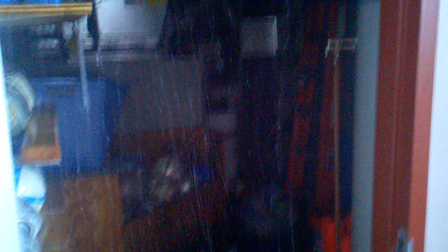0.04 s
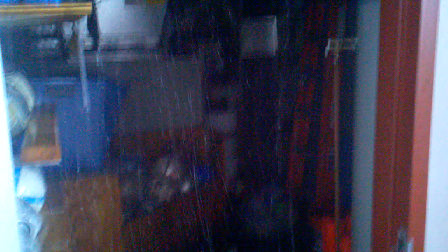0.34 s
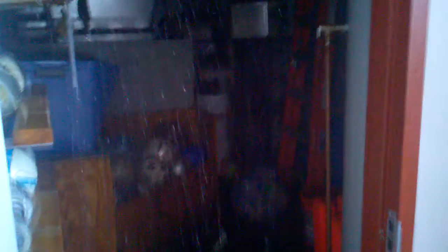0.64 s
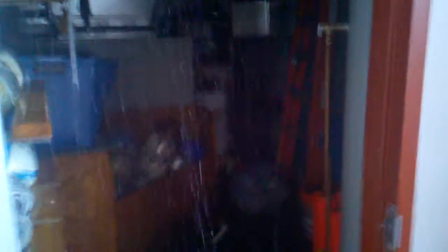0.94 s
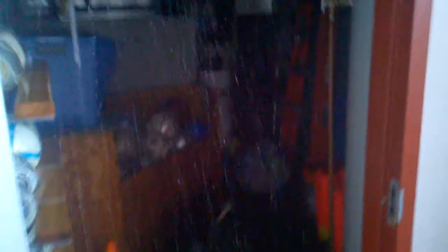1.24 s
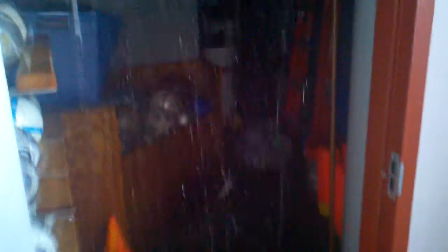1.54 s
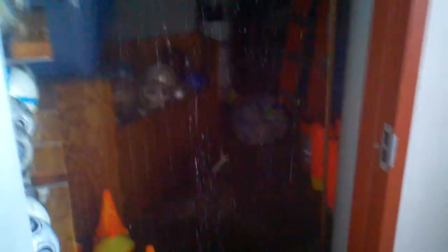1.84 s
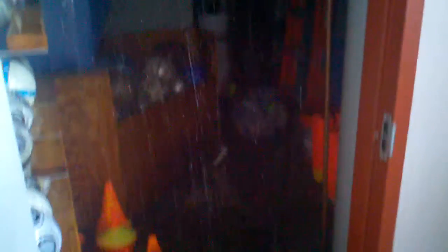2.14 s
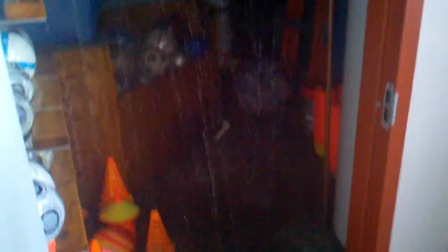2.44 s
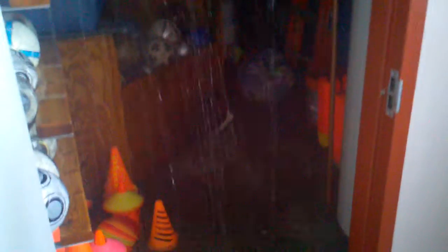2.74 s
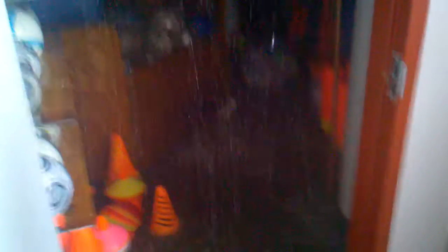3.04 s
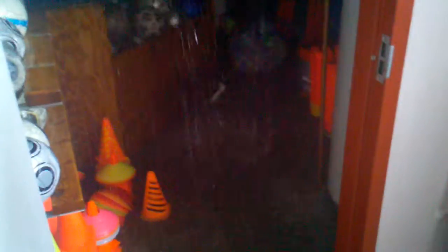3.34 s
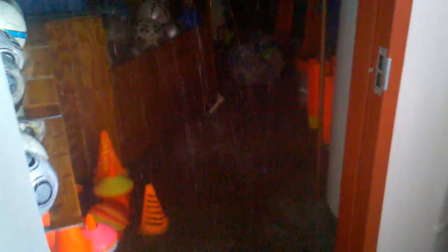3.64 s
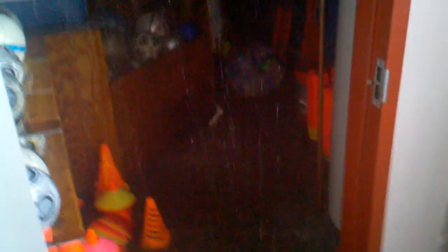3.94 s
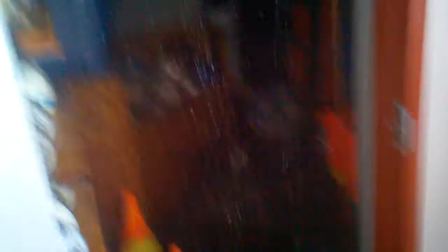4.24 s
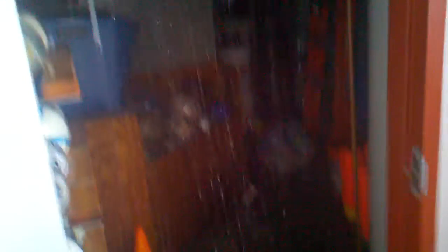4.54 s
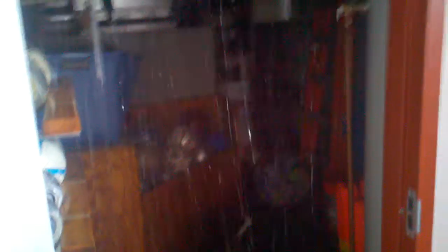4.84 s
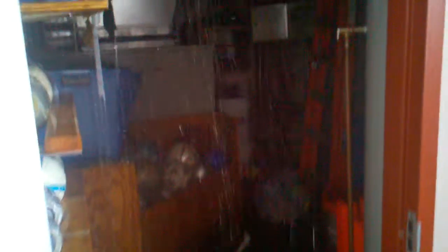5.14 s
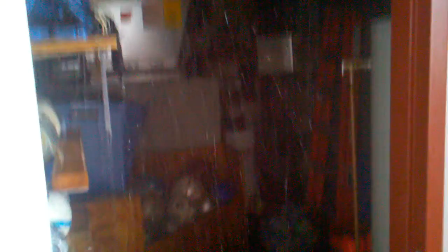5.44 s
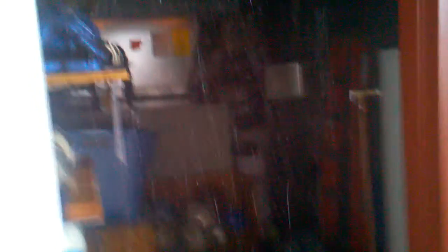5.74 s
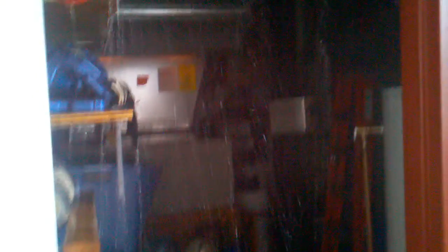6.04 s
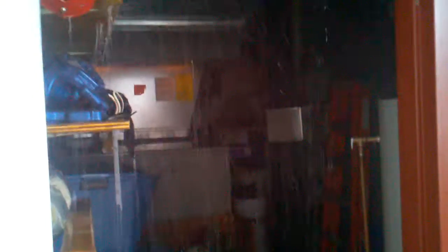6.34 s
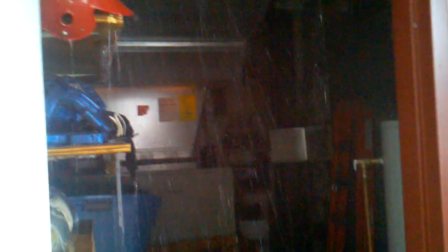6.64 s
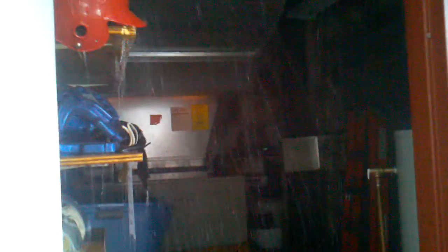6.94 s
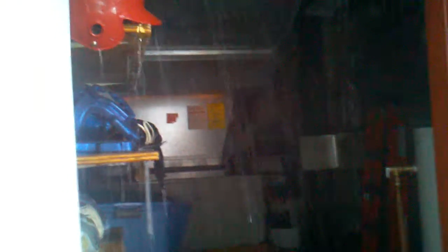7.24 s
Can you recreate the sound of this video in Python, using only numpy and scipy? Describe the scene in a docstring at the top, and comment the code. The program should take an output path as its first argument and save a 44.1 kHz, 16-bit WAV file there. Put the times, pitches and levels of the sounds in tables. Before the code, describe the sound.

After silence, at about 0.6 seconds the sound of water pouring from a ceiling fades in, reaching full level by 0.9 seconds. It is heard from the doorway of a small storeroom: a dense, bright hiss like heavy rain, with countless drops pattering on a wet floor, boxes and stored gear. Tiny puddle plinks and a faint low drumming of hollow objects lie underneath. A sharp drop ticks close to the microphone at 1.3 seconds, with softer ticks around 1.7 to 2.1, and at 5.3 and 5.6 seconds. Small plops fall into puddles between 1.9 and 4 seconds, and again from 6 to 6.6. Heavier gobs splat irregularly throughout, most clearly near 1.2, 2.7, 3.7, 4.2, 5.4 and 6.8 seconds. The downpour wavers slightly and grows a little stronger, still running at the end, around 7.5 seconds.

```python
"""A small storeroom, heard from the doorway: water pours from the flooded ceiling.
Thousands of drops hiss and patter on the wet floor and the stored gear, and hollow things drum
under the stream. Trapped air plinks and plops in the puddles, heavy gobs splat and near drops tick.
The sound fades in from silence."""
import sys
import numpy as np
from scipy import signal
from scipy.fft import rfft, irfft
from scipy.io import wavfile
from scipy.ndimage import uniform_filter1d

SR = 44100
rng = np.random.default_rng(int(sys.argv[2]) if len(sys.argv) > 2 else 0)


def generate_wav(sig):
    """Save sig (samples, or channels by samples) to the path in sys.argv[1] as 16-bit PCM at SR."""
    pcm = np.round(np.clip(np.atleast_2d(sig).T, -1, 1) * 32767).astype(np.int16)
    wavfile.write(sys.argv[1], SR, pcm)


N = 329471
T = np.arange(N) / SR
HZ = np.fft.rfftfreq(N, 1 / SR)
FRAMES = dict(fs=SR, nperseg=1024, noverlap=768)
RIGHT_LAG_S = .000395


def gain_of(db):
    """Decibels to gain."""
    return 10 ** (np.asarray(db) / 20)


def unit_rms(x):
    """Scales to an rms of 1."""
    return x / np.sqrt(np.mean(x ** 2) + 1e-20)


def curve_at(points, hz):
    """Reads a breakpoint curve on a log-frequency axis."""
    f, value = np.transpose(points)
    return np.interp(np.log(hz + 1), np.log(f + 1), value)


def add(mix, s, sound):
    """Mixes a stereo sound in at s seconds."""
    part = mix[:, round(s * SR):][:, :sound.shape[1]]
    part += sound[:, :part.shape[1]]


def band(x, hz, octaves):
    """A band-pass, bell-shaped on a log-frequency axis."""
    f = np.fft.rfftfreq(x.shape[-1], 1 / SR)
    return irfft(rfft(x) * np.exp(-.5 * (np.log2((f + 1) / hz) / octaves) ** 2), x.shape[-1])


def wobble(shape, *spans):
    """A random modulator, smoothed over one span of bins or frames per axis."""
    noise = rng.standard_normal(shape)
    for axis, span in enumerate(spans):
        noise = uniform_filter1d(noise, span, axis=axis)
    return unit_rms(noise)


def impacts(per_s, spread_db, max_spreads):
    """Random impulses, mostly small and a few large."""
    size = gain_of(spread_db * np.minimum(rng.exponential(1, N), max_spreads))
    return size * rng.choice([-1, 1], N) * (rng.random(N) < per_s / SR)


def low_bump(s, db, hz, half_width_s):
    """A soft low bump under a smooth swell, reaching the two sides a quarter cycle apart."""
    pulse = gain_of(db) * np.exp(-((T - s) / half_width_s) ** 2 + 2j * np.pi * hz * (T - s))
    return np.array([pulse.real, pulse.imag])


# Resonances of the hollow things: f/Hz, width/Hz, level/dB
HOLLOW_NOTES = [(118.9, 6.1, -59.5), (681, 21, -57)]


def hollows():
    """The stream keeps hollow things ringing, each on one low note."""
    out = np.zeros((2, N))
    for hz, width, db in HOLLOW_NOTES:
        ring = rfft(rng.standard_normal((2, N))) / (1 + 1j * (HZ - hz) / width) ** 2
        out += gain_of(db) * unit_rms(irfft(ring, N))
    return out


def bubbles(per_s, spread_db, decay_cycles, glide, low_hz, high_hz):
    """Trapped air plinks in the puddles: each bubble rings briefly and rises in pitch as it surfaces."""
    out = np.zeros((2, N))
    t = np.arange(2048) / SR
    for when, pitch, size, place in rng.random((round(per_s * N / SR), 4)):
        hz = low_hz * (high_hz / low_hz) ** pitch
        age = hz * t / decay_cycles
        plink = np.exp(-age) * np.sin(2 * np.pi * hz * t * (1 + glide * age))
        strength = gain_of(spread_db * min(-np.log(1 - size), 3)) * np.sqrt(hz / low_hz)
        pan = [np.cos(2 * np.pi * place), np.sin(2 * np.pi * place)]
        add(out, when * N / SR, strength * np.outer(pan, plink))
    return unit_rms(out)


def floor_slaps(per_s, spread_db, room_t60, room_db, spots=6):
    """Drops slap several spots on the wet floor; each spot rings the room in its own way."""
    t = np.arange(SR // 4) / SR
    out = np.zeros((2, N))
    for _ in range(spots):
        slaps = np.array([impacts(per_s / spots, spread_db, max_spreads=3.7) for _ in range(2)])
        tail = rng.standard_normal((2, len(t))) * gain_of(-60 * t / room_t60) * (t > .003)
        room = signal.oaconvolve(slaps, tail, axes=1)[:, :N]
        out += unit_rms(slaps) + gain_of(room_db) * unit_rms(room)
    return unit_rms(out)


def patter(per_s, spread_db, crack_t60, tail_t60, tail_db, octaves, surfaces=30):
    """Drops on boxes, boards and puddles: each surface answers in its own band with a crack and a tail."""
    t = np.arange(4096) / SR - .004
    crack = gain_of(-60 * abs(t) / crack_t60)
    tail = gain_of(tail_db - 60 * abs(t) / tail_t60)
    envelope = (t > 0) * (crack + tail)
    out = np.zeros((2, N))
    for hz in np.geomspace(450, 11000, surfaces):
        answer = band(rng.standard_normal((2, len(t))) * envelope, hz, octaves)
        hits = impacts(per_s * np.sqrt(hz / 1000), spread_db, max_spreads=4.6)  # denser up high
        taps = signal.oaconvolve(hits[None], answer, axes=1)[:, :N]
        out += np.sqrt(hz) * unit_rms(taps)  # equal power per Hz
    return unit_rms(out)


# Fader rides of the flow, each played around its mean: t/s, patter level/dB, spray level/dB
FLOW_RIDES = [(.8, -32.5, -24), (.92, -32, -20), (1.1, -31, -22), (1.26, -32, -21.8), (1.31, -35, -25),
              (1.45, -34, -25.5), (1.53, -33.5, -24), (1.95, -32, -23.5), (2.55, -30.5, -22.5),
              (2.72, -31.5, -21), (3.07, -30, -23), (3.2, -30.5, -21), (3.46, -30.5, -22),
              (3.6, -30, -21.5), (4.15, -29.5, -21.8), (4.29, -31.5, -23.5), (4.88, -29.5, -20.5),
              (4.98, -31.5, -21.5), (5.4, -30, -20), (5.55, -31, -22.5), (5.97, -29.2, -19.5),
              (6.14, -29.5, -22), (6.27, -30.5, -21), (6.74, -29, -20.1), (6.98, -29.5, -21),
              (7.09, -31, -20), (7.47, -28, -20.3)]


def flow_db(t):
    """How far the patter and the fine spray swell above or sink below their mean levels."""
    s, *rides = np.transpose(FLOW_RIDES)
    return [np.interp(t, s, ride - np.mean(ride)) for ride in rides]


# EQ of the falling water: f/Hz, level/dB
WATER_EQ = [(25, -38), (55, -30), (85, -24), (140, -14.5), (240, -8.5), (500, -10.5), (1100, -11),
            (1500, -9.5), (2100, -4.5), (2800, -6.5), (3350, -5.5), (4200, -8), (5200, -9), (6200, -3),
            (7700, 0.5), (10000, -1.17), (13500, -5.5)]


def pour(x, swell_db, patch_db, flicker_db):
    """Colours the water; the flow swells as a whole, in patches, and in quick spurts."""
    hz, t, spectrum = signal.stft(x, **FRAMES)
    patter_db, spray_db = flow_db(t)
    spray_share = curve_at([(1500, 0.21), (6500, 0.87)], hz)[:, None]
    ride = (1 - spray_share) * patter_db + spray_share * spray_db
    swell = swell_db * wobble(len(t), 14)
    flicker = flicker_db * wobble(len(t), 4)
    patches = patch_db * wobble(spectrum.shape, 45, 8)
    moving = signal.istft(spectrum * gain_of(ride + swell + flicker + patches), **FRAMES)[1][:, :N]
    return unit_rms(irfft(rfft(moving) * gain_of(curve_at(WATER_EQ, HZ)), N))


# Big drops into puddles and containers: t/s, level/dB, f/Hz, t60/s
PLOP_CUES = [(1.912, -35.5, 640, 0.14), (2.028, -28, 2065, .1), (2.236, -37, 825, .12),
             (2.666, -35.5, 660, 0.11), (2.817, -19, 1870, 0.035), (3.004, -37, 817, .13),
             (3.279, -34.5, 830, .15), (4.012, -39, 500, .06), (5.986, -31, 730, .08),
             (6.288, -27, 1880, .09), (6.634, -33, 1025, .08)]


def plops(trim_db, attack_s, glide, smear_db):
    """Each drop sets a pocket of air ringing on a note that rises a little; the room smears part of it."""
    out = np.zeros((2, N))
    t = np.arange(8192) / SR
    for s, db, hz, t60 in PLOP_CUES:
        phase = 2 * np.pi * hz * t * (1 + glide * t / t60)
        smear = unit_rms(band(rng.standard_normal((2, len(t))), hz, octaves=0.14))
        ring = np.array([np.sin(phase), np.cos(phase)]) + gain_of(smear_db) * smear
        envelope = (1 - np.exp(-t / attack_s)) * gain_of(-60 * t / t60)
        add(out, s, gain_of(trim_db + db) * ring * envelope)
    return out


def gob(hz, octaves, t60, crack_db, crack_t60=0.012, grain_db=3, attack_share=0.026):
    """A gob lands with a crack and bursts into a dying cluster of droplets."""
    t = np.arange(8192) / SR
    grains = gain_of(grain_db * np.repeat(rng.standard_normal(len(t) // 32), 32))  # droplet sizes
    burst = unit_rms(band(rng.standard_normal((2, len(t))) * grains, hz, octaves))
    droplets = (1 - np.exp(-t / (attack_share * t60))) * gain_of(-60 * t / t60)
    crack = (1 - np.exp(-hz * t)) * gain_of(crack_db - 60 * t / crack_t60)
    return burst * (droplets + crack)


def spatter(per_s, top_db, spread_db, low_hz, high_hz):
    """Lighter gobs break off the stream at random and land all over the room."""
    out = np.zeros((2, N))
    for when, pitch, size in rng.random((round(per_s * N / SR), 3)):
        hz = low_hz * (high_hz / low_hz) ** pitch
        splash = gob(hz, octaves=0.3, t60=0.056, crack_db=-1)
        add(out, when * N / SR, gain_of(top_db - spread_db * size) * splash)
    return out


# Heavy gobs landing: t/s, level/dB, centre f/Hz, width/octaves, crack over droplets/dB
SPLAT_CUES = [(1.088, -27, 2400, 0.53, -6), (1.18, -23, 7000, .22, -12), (1.197, -21, 7100, 0.22, -12),
              (1.503, -30, 3400, .3, -1), (1.563, -33, 3200, .25, 0), (1.732, -35, 1450, .3, -6),
              (1.815, -26, 3000, .4, -5), (2.03, -30, 2200, .22, -4), (2.304, -26.5, 2840, .16, -4),
              (2.326, -28, 5500, .6, -4), (2.601, -28, 2480, 0.24, -2), (2.677, -27, 2100, 0.23, -3),
              (2.684, -21.8, 4400, .62, -8), (2.916, -29, 3850, .22, -3), (3.533, -25.5, 4000, .42, -4),
              (3.707, -21.5, 2130, .45, 7), (4.007, -29, 3050, .18, -2), (4.16, -22.5, 7200, 0.31, -4),
              (4.429, -29, 3700, .35, -2), (4.646, -34, 1380, .2, -4), (4.876, -28.5, 1880, .35, -3),
              (5.224, -24, 8500, .35, -10), (5.267, -30.5, 2400, .3, -2), (5.368, -23, 6300, 0.56, -2),
              (5.452, -28.5, 3800, .25, -1), (5.734, -27, 2900, .28, -5), (5.752, -30, 3700, 0.18, -3),
              (5.86, -28, 2850, .35, 2), (5.907, -33, 1400, 0.52, -4), (6.636, -28.5, 1150, .42, -3),
              (6.755, -23.5, 2170, 0.46, -2), (6.805, -26, 4000, 0.64, -4), (6.836, -27.5, 2760, .2, 0),
              (7.428, -25, 2230, .76, -2)]


def splats(trim_db, usual_db, usual_t60, doubling_db):
    """The heaviest gobs splat on wet surfaces; one that is doubling_db louder lasts twice as long."""
    out = np.zeros((2, N))
    for s, db, hz, octaves, crack_db in SPLAT_CUES:
        t60 = usual_t60 * 2 ** ((db - usual_db) / doubling_db)
        add(out, s, gain_of(trim_db + db) * gob(hz, octaves, t60, crack_db))
    return out


# Close-up drop ticks: t/s, peak level/dB, f/Hz, attack/s
TICK_CUES = [(1.26337, -4.8, 6900, .00044), (1.6947, -15.5, 7900, .00025), (1.8991, -14.5, 9400, .00018),
             (2.1459, -16, 8300, .00022), (5.31515, -11, 8300, .00036), (5.6071, -14, 9000, .00018)]


def near_drops():
    """A near drop snaps for a few cycles and reaches the left microphone first."""
    out = np.zeros((2, N))
    t = np.maximum(np.arange(256) / SR - np.array([[0], [RIGHT_LAG_S]]), 0)
    for s, db, hz, attack in TICK_CUES:
        snap = (t / attack) ** 2 * np.exp(1 - (t / attack) ** 2)
        add(out, s, gain_of(db) * snap * np.sin(2 * np.pi * hz * t))
    return out


# Stereo image: f/Hz, left-right correlation (-1..1)
CORRELATION = [(50, -1), (110, 0.6), (330, 0.8), (470, 0.54), (650, 0.78), (1050, 1), (1400, 1),
               (1850, 0.05), (2250, -0.32), (2370, -1), (2820, -1), (3250, 0.27), (3750, 0.6), (4150, .85),
               (4550, 0.35), (5150, 0.71), (5700, 0.31), (14000, 0.4)]
# Waver of the width: f/Hz, spread of the correlation
WIDTH_WAVER = [(2820, 0), (3050, 0.28), (4300, 0.14), (5150, 0.41), (6000, 0.19), (14000, .16)]
# Pan across the spectrum: f/Hz, left over right/dB
PAN_CURVE = [(110, -1), (190, 2.5), (420, 5), (700, 2), (1100, 2), (1800, -1.5), (2400, 0), (2800, -1),
             (8000, -0.15)]


def microphones(x, lag_from_hz=3900):
    """Two parts of the sound field form mid and side; in the treble the width wavers and the right lags."""
    hz, _, spectrum = signal.stft(x, **FRAMES)
    waver = curve_at(WIDTH_WAVER, hz)[:, None] * wobble(spectrum.shape[1:], 7, 16)
    correlation = np.clip(curve_at(CORRELATION, hz)[:, None] + waver, -1, 1)
    weights = np.sqrt([(1 + correlation) / 2, (1 - correlation) / 2])
    mid, side = rfft(signal.istft(spectrum * weights, **FRAMES)[1][:, :N])
    lag = np.exp(-2j * np.pi * RIGHT_LAG_S * np.maximum(HZ - lag_from_hz, 0))
    lean = gain_of(curve_at(PAN_CURVE, HZ) / 2)
    return irfft(np.array([(mid + side) * lean, (mid - side) * lag / lean]), N)


def scene():
    """Far wash, slaps and patter make the downpour; plinks, plops, splats and ticks play over it."""
    wash = rng.standard_normal((2, N))
    slaps = floor_slaps(per_s=2200, spread_db=4, room_t60=0.19, room_db=-2)
    taps = patter(per_s=110, spread_db=3.5, crack_t60=0.0067, tail_t60=0.13, tail_db=-8, octaves=0.25)
    bed = gain_of(-2.5) * wash + gain_of(-1.5) * slaps + gain_of(-5) * taps
    downpour = gain_of(-23.5) * pour(bed, swell_db=0.35, patch_db=1.36, flicker_db=0.7)
    plinks = bubbles(per_s=70, spread_db=2.5, decay_cycles=22.4, glide=0.0073, low_hz=1151, high_hz=4230)
    heavy_gobs = splats(trim_db=1, usual_db=-28.5, usual_t60=.1, doubling_db=9)
    big_drops = plops(trim_db=1.5, attack_s=.002, glide=0.024, smear_db=-7.5)
    drumming = hollows()
    light_gobs = spatter(per_s=3, top_db=-31.5, spread_db=4, low_hz=2160, high_hz=6040)
    patter_db, _ = flow_db(T)
    sprinkle = gain_of(patter_db) * (light_gobs + gain_of(-47) * plinks)
    room = microphones(drumming + sprinkle + downpour + big_drops + heavy_gobs)
    return low_bump(s=5.355, db=-60, hz=50, half_width_s=.011) + room + near_drops()


def record(dry, fade_from_s=0.6427, fade_to_s=0.9, cutoff_hz=14020):
    """A fade-in from silence, then a steep high cut."""
    fade = np.clip((T - fade_from_s) / (fade_to_s - fade_from_s), 0, 1) ** 0.9
    high_cut = signal.firwin(1023, cutoff_hz, window=("kaiser", 9), fs=SR)
    return signal.oaconvolve(dry * fade, high_cut[None], "same", axes=1)


dry = scene()
out = record(dry)
generate_wav(out)
```